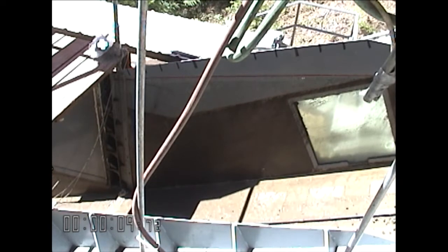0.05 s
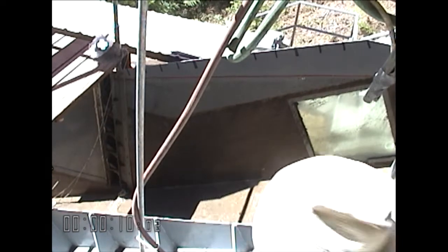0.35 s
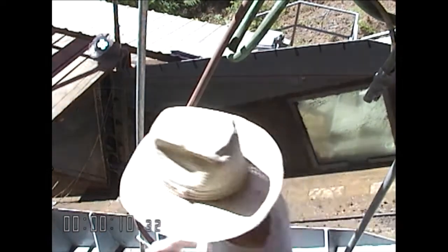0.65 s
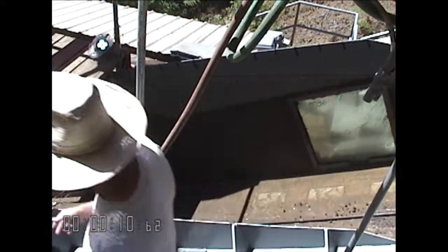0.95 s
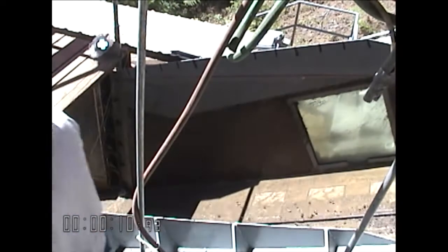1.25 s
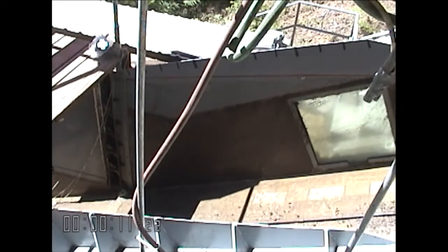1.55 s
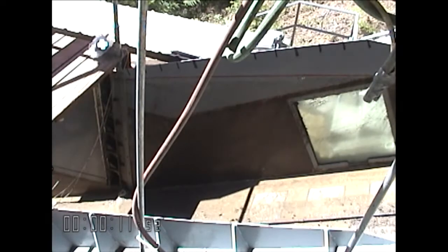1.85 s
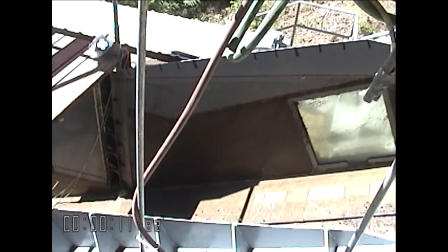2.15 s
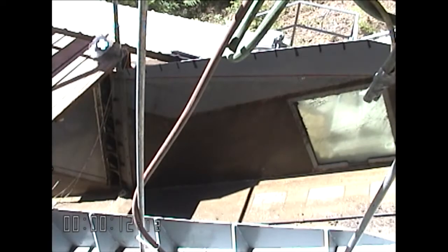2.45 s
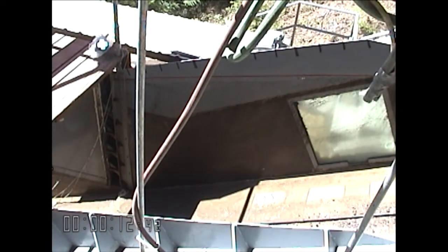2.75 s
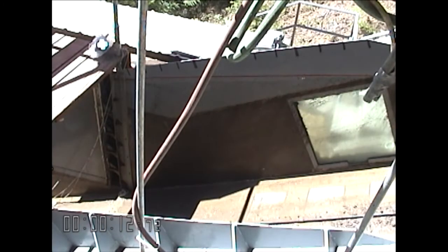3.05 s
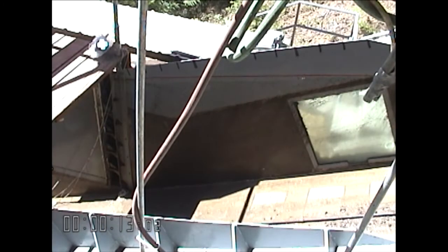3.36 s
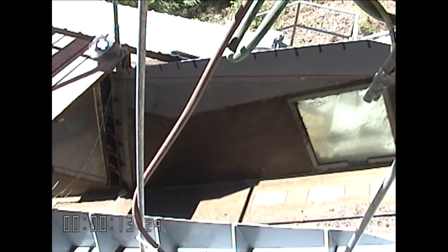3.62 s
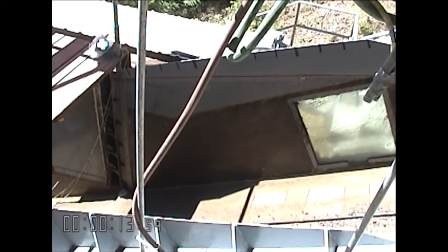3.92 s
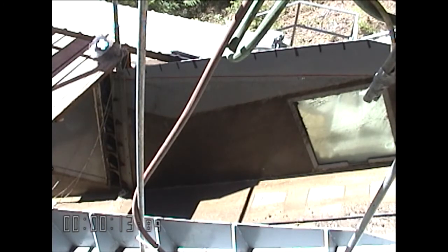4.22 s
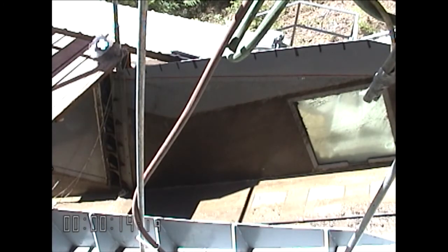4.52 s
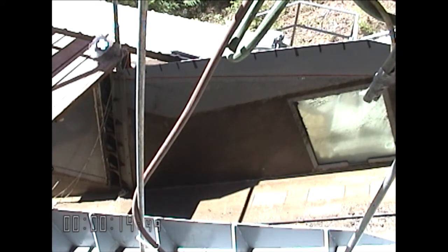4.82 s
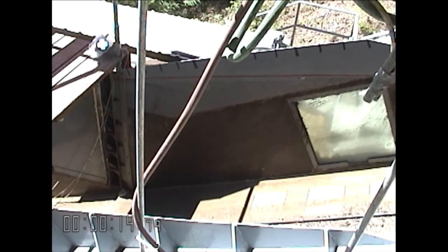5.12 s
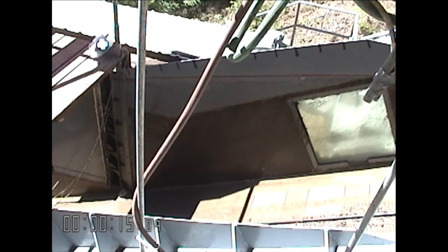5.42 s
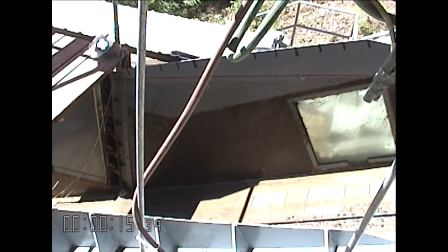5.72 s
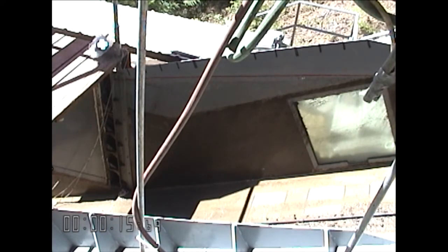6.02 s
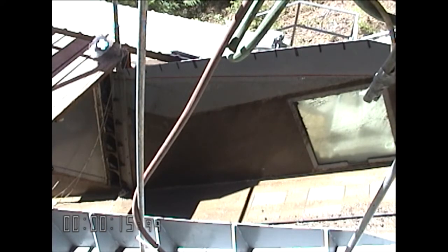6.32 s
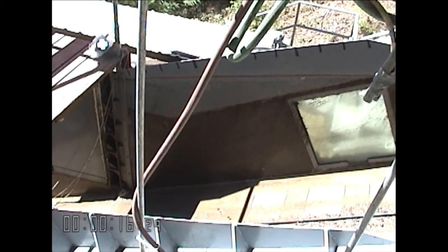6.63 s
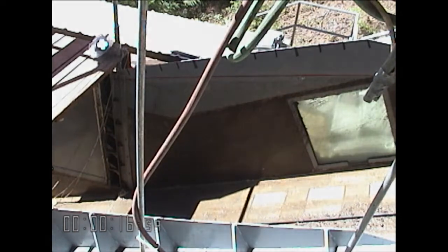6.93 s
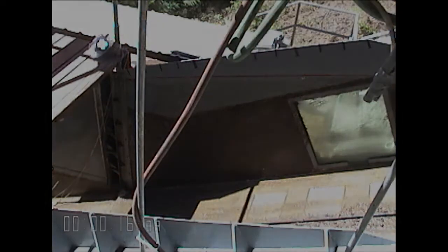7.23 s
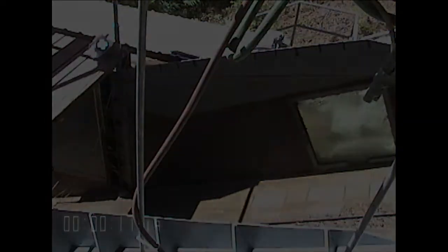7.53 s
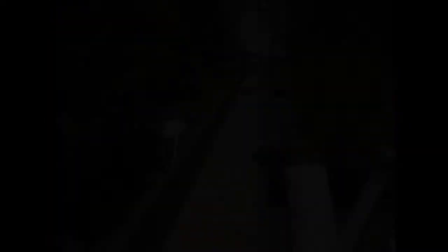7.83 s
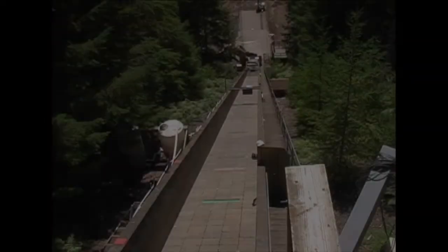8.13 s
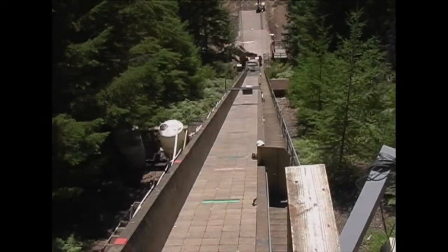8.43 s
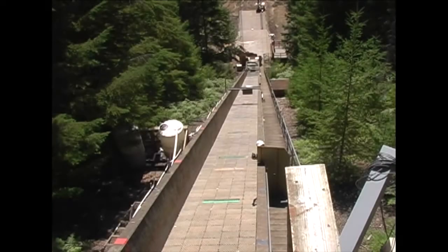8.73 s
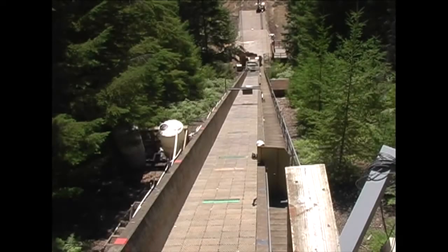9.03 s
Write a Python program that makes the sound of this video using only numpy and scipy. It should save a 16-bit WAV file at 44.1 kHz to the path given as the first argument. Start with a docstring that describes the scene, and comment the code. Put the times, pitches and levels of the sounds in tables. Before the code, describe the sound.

Heard from a platform over an outdoor concrete channel, a surge of water roars and splashes while three soft steps thud nearby. The flow gradually weakens to a fizzing wash, with small plops, sharp clicks of grit and stones knocking together over a faint low pump hum. Near the end everything fades away and a steady, throbbing engine takes over.

```python
"""An outdoor concrete flume: water and debris rush down, surge for about two seconds, then ebb.
The water roars, splashes and sprays, trapped air plops, and stones clack and click as they collide.
A pump hums and three soft steps set the platform rumbling. The sound fades out, then fades in
on a quieter spot above the flume, where an engine drones and throbs with each firing."""
import sys
import numpy as np
from scipy import signal
from scipy.fft import rfft, irfft, next_fast_len
from scipy.io import wavfile
from scipy.ndimage import uniform_filter1d, map_coordinates

SR = 44100
rng = np.random.default_rng(int(sys.argv[2]) if len(sys.argv) > 2 else 0)


def int16_out(signal):
    """Quantize to a 16-bit WAV file."""
    q = np.round(np.clip(np.atleast_2d(signal).T, -1, 1) * 32767)
    wavfile.write(sys.argv[1], SR, q.astype(np.int16))


N = 408807

# Stereo balance of the water. Each row: frequency in Hz, left minus right in dB.
WATER_BALANCE = [(60, -1.5), (200, -5), (350, -4), (640, -1.5), (1150, -0.7), (2000, 0)]
# Splashing wash, slower to subside than the flow. Each row: time in seconds, level in dB.
WASH_ENVELOPE = [(0, -26), (1.2, -26), (2.4, -26.5), (3.2, -29.5), (4.8, -31), (5.4, -31), (6.9, -33.5)]
EBB_DB_PER_DB = 1.12  # spray and gravel level per dB of flow


def amp(db):
    """Decibels to gain."""
    return 10 ** (np.asarray(db) / 20)


def unit(x):
    """Scale to rms 1."""
    return x / np.sqrt(np.mean(x ** 2) + 1e-20)


def along(points, hz):
    """Interpolate (Hz, value) rows on a log axis."""
    knots_hz, values = np.transpose(points)
    return np.interp(np.log(hz + 1), np.log(knots_hz + 1), values)


def curve(points):
    """Interpolate (seconds, value) rows at every sample."""
    knots_s, values = np.transpose(points)
    return np.interp(np.arange(N) / SR, knots_s, values)


def wobble(rate_hz):
    """Smooth random curve, rate_hz knots a second."""
    at = np.linspace(0, N, N // 32)
    knots = rng.standard_normal(int(N * rate_hz / SR) + 4)
    return np.interp(np.arange(N), at, map_coordinates(knots, [at * rate_hz / SR]))


def filtered(x, response):
    """Apply a complex frequency response."""
    n = x.shape[-1]
    padded = next_fast_len(n + SR // 4)
    return irfft(rfft(x, padded) * response(np.fft.rfftfreq(padded, 1 / SR)), padded)[..., :n]


def resonance(f, hz, width_hz):
    """Response of one damped mode."""
    return 1j * f * width_hz / (hz * hz - f * f + 1j * f * width_hz)


def add(track, start_s, sound):
    """Mix a sound into a track."""
    part = track[..., round(start_s * SR):][..., :sound.shape[-1]]
    part += sound[..., :part.shape[-1]]


def flow_db():
    """Flow strength relative to the height of the surge."""
    # Each row: time in seconds, relative strength in dB.
    strength = [(0.0, -27), (1.67, -26.5), (3.09, -33.5), (4.65, -34.5), (5.21, -36.5), (6.82, -38),
                (6.9, -38.5)]
    strength_db = curve(strength)
    return strength_db - strength_db.max()


def impacts(rate_hz, spread_db):
    """Two trains of tiny random impacts; spread_db makes a few stand out."""
    size = amp(spread_db * np.minimum(rng.exponential(size=(2, N)), 2)) * rng.choice([-1, 1], (2, N))
    return unit(size * (rng.random((2, N)) < rate_hz / SR))


def struck(peak_db, contact_t60_s, rattle_t60_s, rattle, response):
    """A brief gritty contact and its dying rattle, rung through a response."""
    t = np.arange(SR // 4) / SR
    envelope = amp(-60 * t / contact_t60_s) + rattle * amp(-60 * t / rattle_t60_s)
    sound = filtered(rng.choice([-1, 1], len(t)) * envelope, response)
    return amp(peak_db) * sound / np.abs(sound).max()


def strays(max_db, spread_db, db_per_flow_db, ring_hz, octaves, count):
    """Scattered lesser hits, weaker as the flow ebbs. Each row: start in seconds, peak in dB, Hz."""
    when, size, pitch = rng.random((count, 3)).T
    at = ((np.arange(count) + when) / count * N).astype(int)
    peak_db = max_db - spread_db * size + db_per_flow_db * flow_db()[at]
    return list(zip(at / SR, peak_db, ring_hz * 2 ** (octaves * (pitch - .5))))


def hum(tones, drift, flutter_db, rough_rad):
    """Machine tones drift together in pitch; each wavers in level and phase on its own."""
    clock_s = np.cumsum(1 + drift * wobble(3)) / SR
    tone = lambda hz: np.sin(2 * np.pi * (hz * clock_s + rng.random()) + rough_rad * wobble(24))
    return np.sqrt(2) * sum(amp(db + flutter_db * wobble(4.4)) * tone(hz) for hz, db in tones)


def pump():
    """A low wavering hum, to the right."""
    # Each row: frequency in Hz, rms level before panning in dB.
    tones = [(35.9, -59.5), (54, -66.5), (72, -59), (119.8, -53.6), (161.8, -59.5)]
    return hum(tones, drift=.00089, flutter_db=1.5, rough_rad=.38) * amp([[-3], [2.3]])


def steps():
    """Each footfall sets the platform rumbling briefly."""
    # Each row: start in seconds, relative level in dB, thud in Hz, t60 in seconds.
    thuds = [(.257, -23.5, 134, 0.59), (.85, -29, 122, 0.32), (.93, -40, 48, .5), (1.44, -30.5, 80, .35)]
    out, t = np.zeros(N), np.arange(SR // 2) / SR
    for start_s, db, hz, t60_s in thuds:
        rumble = unit(filtered(rng.standard_normal(len(t)), lambda f: resonance(f, hz, .95 * hz) ** 2))
        envelope = amp(-60 * t / t60_s) * (1 - np.exp(-t / .0089))
        add(out, start_s, .49 * amp(db) * rumble * envelope)
    return out


def engine(noise_db, firing_hz, throb, stereo_width):
    """A drone over mechanical noise whose midrange swells, a little unevenly, with every firing."""
    # Each row: frequency in Hz, rms level before panning in dB.
    tones = [(54, -76), (72, -68), (119.6, -53.5), (219.5, -45), (240.4, -48), (263.3, -44.7), (340, -53),
             (370.8, -49.5), (394.3, -47.3), (527, -56.3), (566, -53.8), (699.7, -58.5), (742.6, -59.5),
             (1060, -60), (1148.5, -60.5), (1237, -63), (1325, -58.5), (1410, -63)]
    # Each row: frequency in Hz, relative noise density in dB.
    spectrum = [(25, -30), (60, -18), (110, -9), (200, -5), (340, -3.5), (480, -4.5), (560, -8),
                (610, -11.5), (700, -6), (850, -10.5), (1300, -9), (1700, -14.5), (2550, -13.5),
                (3200, -21.5), (5200, -29), (11000, -35), (12000, -44)]
    mid, side = filtered(rng.standard_normal((2, N)), lambda hz: amp(along(spectrum, hz)))
    noise = unit(np.array([mid + stereo_width * side, mid - stereo_width * side]))
    clatter = filtered(noise, lambda f: np.abs(resonance(f, hz=1300, width_hz=1700)))
    depth = throb * amp(3 * np.tanh(wobble(12)))
    firing = depth * np.cos(2 * np.pi * firing_hz * np.arange(N) / SR + .5 * wobble(8))
    drone = hum(tones, drift=.001964, flutter_db=1.5, rough_rad=.24) * amp([[-.2], [.2]])
    return amp(noise_db) * (noise + firing * clatter) + drone


def wall_echo(x, stereo_width):
    """Echo between the flume's walls; the treble dies first."""
    # Each row: frequency in Hz, t60 in seconds.
    decay = [(200, .3), (3000, 0.18), (11000, 0.18)]
    hz, t, noise = signal.stft(rng.standard_normal((2, SR // 3)), SR, nperseg=256)
    mid, side = signal.istft(noise * amp(-60 * t / along(decay, hz)[:, None]), SR, nperseg=256)[1]
    tail = np.array([mid + stereo_width * side, mid - stereo_width * side]) / np.linalg.norm(mid)
    return signal.fftconvolve(x, tail, axes=1)[:, :N]


def bubbles(re_wash_db, centre_hz, decay_cycles, rise_per_s, count):
    """Trapped air rings as short rising plops; their level follows the wash."""
    out, t = np.zeros(N), np.arange(SR // 10) / SR
    for when, pitch, size in rng.random((count, 3)):
        hz = centre_hz * 2 ** (3 * pitch - 1.5)
        ring = np.sin(2 * np.pi * hz * t * (1 + rise_per_s * t))
        envelope = np.exp(-t * hz / decay_cycles) * (1 - np.exp(-t / .0022))
        add(out, when * N / SR, size ** 2 * ring * envelope)
    return amp(re_wash_db + curve(WASH_ENVELOPE)) * unit(out)


def gravel(surge_db, ring_hz, width_hz):
    """Pebbles chatter in clusters along the bed, as hard as the current pushes them."""
    contacts = impacts(rate_hz=130, spread_db=0)[0] * amp(3.1 * np.tanh(wobble(14)))
    chatter = unit(filtered(contacts, lambda f: resonance(f, ring_hz, width_hz) ** 2))
    return amp(surge_db + EBB_DB_PER_DB * flow_db()) * chatter


def debris_knocks(contact_t60_s, rattle_t60_s, rattle):
    """Bigger pieces hit the channel with lower, hollower knocks."""
    # Each row: start in seconds, peak in dB, ring in Hz, bandwidth in Hz.
    hits = [(.422, -17.5, 1510, 75), (.424, -17.5, 2580, 260), (6.233, -30, 610, 70),
            (6.255, -29.5, 840, 110), (6.272, -25.5, 960, 150)]
    out = np.zeros(N)
    for start_s, db, hz, width_hz in hits:
        ring = lambda f: resonance(f, hz, width_hz) ** 2
        add(out, start_s, struck(db, contact_t60_s, rattle_t60_s, rattle, ring))
    return out


def grit_clicks(width_hz, contact_t60_s, skitter_t60_s):
    """Flung grit hits once, sharply, and skitters on, a little to one side."""
    # Each row: start in seconds, peak before panning in dB, ring in Hz, skitter gain.
    hits = [(.6793, -16, 7000, .2), (.924, -16, 9500, .25), (1.2872, -3.5, 7300, .14), (1.29, -6, 9400, .2),
            (1.5981, -8, 9600, .12), (1.6214, -12, 8000, .12), (2.2143, -17, 7000, .25),
            (2.6345, -15, 6300, .15), (2.8663, -11, 5900, .14), (3.1267, -19, 5600, .25),
            (3.5996, -20, 5600, .25), (4.1647, -8, 5500, .13), (4.1678, -10, 4400, .12),
            (4.2562, -21, 8500, .3), (4.3964, -14.5, 9200, .07), (4.5108, -14.5, 8700, .12),
            (4.648, -19, 7400, .4), (4.755, -16, 10500, .15), (4.7599, -12.5, 10500, .1),
            (4.9433, -13.5, 9200, .12), (4.951, -8, 9500, .08), (5.3702, -23, 6500, .5),
            (5.4735, -21, 6000, .2), (5.6545, -24, 9600, .4), (5.7592, -23, 6500, .2),
            (5.8967, -11, 7500, .03), (5.9476, -21, 8000, .2), (5.9767, -20, 7000, .15),
            (6.3742, -26, 9000, .3), (6.4206, -23, 6800, .3), (6.876, -22.5, 9200, .25),
            (7.3763, -17, 5000, .2)]
    lesser = strays(max_db=-18.5, spread_db=4, db_per_flow_db=.7, ring_hz=7200, octaves=1, count=36)
    lesser = [(*hit, rng.uniform(.15, .4)) for hit in lesser]
    out = np.zeros((2, N))
    for start_s, db, hz, skitter in hits + lesser:
        ring = lambda f: resonance(f, hz, width_hz) / np.sqrt(1 + (f / 11300) ** 40)
        pan = amp(rng.normal(0, .49) * np.array([[1], [-1]]))
        add(out, start_s, pan * struck(db, contact_t60_s, skitter_t60_s, skitter, ring))
    return out


def stone_clacks(contact_t60_s, scrape, scrape_t60_gaps, bounces, bounce_db, clink_db, clink_width_hz):
    """Stones meet with a narrow clink, scrape and bounce, each time weaker and slightly retuned."""
    # Each row: start in seconds, peak in dB, ring in Hz, bandwidth in Hz, bounce gap in seconds.
    hits = [(1.962, -16, 3400, 1500, 0.0016), (2.0307, -14, 3900, 3000, 0.0033),
            (2.6924, -23, 4020, 1200, .005), (3.023, -22, 4100, 1300, 0.008),
            (3.071, -25.5, 4100, 1000, .006), (3.2536, -25, 4000, 1500, .006),
            (3.3065, -24, 3950, 900, .008), (3.4234, -21, 3980, 900, 0.0065),
            (3.8927, -16.7, 3750, 1200, .014), (3.9275, -20, 3700, 1200, .005),
            (3.9386, -17.5, 3900, 1300, .016), (4.0459, -17.5, 3950, 1600, .004),
            (4.1648, -14.5, 2900, 1000, .005), (4.3258, -13, 3850, 1100, .007),
            (4.549, -23, 3800, 1200, .005), (4.648, -20, 4300, 2000, 0.01), (4.8106, -24, 3750, 1200, .005),
            (5.2705, -23.5, 3900, 1600, 0.013), (5.6387, -25, 4200, 2000, 0.011),
            (5.7426, -21.5, 3900, 1600, .011), (6.026, -22, 3850, 1700, 0.015),
            (6.106, -22.7, 3940, 1000, 0.0078), (7.098, -26, 3950, 1200, .011),
            (7.2, -27.5, 3850, 1100, .008), (7.334, -21, 3750, 1400, 0.012),
            (7.6184, -21, 3950, 1400, 0.0069)]
    lesser = strays(max_db=-24, spread_db=4, db_per_flow_db=.43, ring_hz=3900, octaves=.2, count=12)
    lesser = [(*hit, rng.uniform(900, 1800), rng.uniform(.0041, .012)) for hit in lesser]
    out = np.zeros(N)
    for start_s, db, hz, width_hz, gap_s in hits + lesser:
        for k in range(bounces):
            pitch_hz = hz * 2 ** (.025 * rng.normal())
            body = lambda f: resonance(f, pitch_hz, width_hz)
            ring = lambda f: body(f) * (body(f) + amp(clink_db) * resonance(f, pitch_hz, clink_width_hz))
            clack = struck(db + k * bounce_db, contact_t60_s, scrape_t60_gaps * gap_s, scrape, ring)
            add(out, start_s + k * gap_s, clack)
    return out


def gushes():
    """Waves of water pass, each swelling and sinking in its own band."""
    # Each row: crest in seconds, level in dB, centre in Hz, bandwidth in Hz, half length in seconds.
    waves = [(.3, -31, 754, 1100, 0.16), (1.8, -31.5, 2300, 1600, 0.68), (2.003, -31.5, 4400, 2600, 0.07),
             (3.5, -41, 376.9, 90, 0.67)]
    out, t = np.zeros((2, N)), np.arange(N) / SR
    for crest_s, db, hz, width_hz, half_s in waves:
        rush = unit(filtered(rng.standard_normal(N), lambda f: resonance(f, hz, width_hz) ** 2))
        pan_db = along(WATER_BALANCE, hz) * np.array([[.5], [-.5]])
        out += amp(db + pan_db) * rush * np.exp(-((t - crest_s) / half_s) ** 2)
    return out


def churn(patchy_db):
    """Two noises whose level varies in patches of time and pitch."""
    noise = signal.stft(rng.standard_normal((2, N)), nperseg=512)[2]
    patches = uniform_filter1d(rng.standard_normal(noise.shape[1:]), size=4, axis=0)
    patches = unit(uniform_filter1d(patches, size=9, axis=1))
    return unit(signal.istft(noise * amp(patchy_db * patches), nperseg=512)[1][:, :N])


def in_flume(pair, spectrum):
    """Colour two unrelated signals and place them in the hollow channel: stereo, rms 1."""
    # Each row: resonance in Hz, bandwidth in Hz, lift in dB.
    modes = [(284, 32, 1), (385, 41, 5), (521, 23, 3), (936, 33, 3.5), (1370, 54, 2), (1557, 89, 2)]
    # Each row: frequency in Hz, left-right coherence.
    coherence = [(60, 0.9), (250, 0.99), (600, 0.9), (1200, 0.97), (2000, 1), (4200, 1), (5300, 0.99),
                 (7500, 0.64), (11000, 0.88)]
    # Each row: frequency in Hz, phase lead of the left in radians.
    lead = [(60, -.1), (250, -0.16), (600, -0.3), (1300, -0.11), (2000, 0)]
    hollow_db = lambda f: sum(db * np.abs(resonance(f, hz, width_hz)) ** 2 for hz, width_hz, db in modes)
    colour = lambda f: amp(along(spectrum, f) + hollow_db(f))
    spread_rad = lambda f: np.arccos(np.clip(along(coherence, f), -1, 1)) / 2
    mid, side = filtered(pair, lambda f: colour(f) * [np.cos(spread_rad(f)), np.sin(spread_rad(f))])
    half = np.array([[.5], [-.5]])
    pan = lambda f: amp(half * along(WATER_BALANCE, f)) * np.exp(1j * half * along(lead, f))
    return unit(filtered(np.array([mid + side, mid - side]), pan))


def roar(start_db, fall_db, drain_s):
    """The deep roar dies away ever faster as the flume drains."""
    # Each row: frequency in Hz, relative density in dB.
    spectrum = [(35, -35.5), (55, -28), (95, -14), (135, -8), (185, -8), (250, -1.5), (400, -3), (560, -1),
                (720, -5), (910, -12.5), (1500, -68)]
    level_db = start_db - fall_db * (np.arange(N) / SR / drain_s) ** 1.13
    return amp(level_db + .38 * wobble(8.2)) * in_flume(churn(patchy_db=.5), spectrum)


def wash():
    """Churning water and small splashes fill the midrange."""
    # Each row: frequency in Hz, relative density in dB.
    spectrum = [(350, -21.5), (600, -3.5), (800, -1.2), (1200, -0.8), (1600, -2), (2100, -3), (2800, -6),
                (3200, -8.5), (4200, -28), (7000, -84.5)]
    splashes = unit(churn(patchy_db=.98) + .48 * impacts(rate_hz=900, spread_db=2.5))
    return amp(curve(WASH_ENVELOPE) + .17 * wobble(14)) * in_flume(splashes, spectrum)


def spray(surge_db, breakup_db):
    """Dense spray breaks up into clumps of drops, fully once the flow has fallen by breakup_db."""
    # Each row of both: frequency in Hz, relative density in dB.
    mist_spectrum = [(1710, -11), (2900, -1.5), (5810, -1), (8250, -7), (9290, -7.5), (10800, -12),
                     (11600, -15.5), (12000, -24), (15600, -52), (22000, -120)]
    trickle_spectrum = [(1710, -38.5), (2900, -4.5), (3360, -1), (3880, -0.5), (5510, -7), (8450, -11),
                        (9860, -10.5), (11200, -14.5), (12000, -22.5), (15600, -63.5), (22000, -120)]
    mist = unit(churn(patchy_db=1.5) + .5 * impacts(rate_hz=1300, spread_db=7))
    mist = in_flume(mist, mist_spectrum)
    drops = impacts(rate_hz=350, spread_db=1) * amp(6.6 * np.tanh(wobble(22)))
    trickle = in_flume(unit(churn(patchy_db=2) + .45 * drops), trickle_spectrum)
    dense = np.clip(1 + flow_db() / breakup_db, 0, 1)
    fizz = np.sqrt(dense) * mist + np.sqrt(1 - dense) * trickle
    return amp(surge_db + EBB_DB_PER_DB * flow_db()) * fizz


def scene():
    """The flume fades out, then the engine fades in."""
    # Each row of both: time in seconds, gain.
    fade_out = [(6.88, 0.99), (7.4, 0.44), (7.85, 0.002)]
    fade_in = [(7.85, 0), (8.1, 0.3), (8.5, 0.88)]
    stones = grit_clicks(width_hz=3600, contact_t60_s=.0014, skitter_t60_s=.06)
    stones += stone_clacks(contact_t60_s=.003, scrape=.26, scrape_t60_gaps=9,
                           bounces=3, bounce_db=-2.5, clink_db=-3, clink_width_hz=280)
    stones += debris_knocks(contact_t60_s=.00075, rattle_t60_s=.033, rattle=.016)
    bed = gravel(surge_db=-38, ring_hz=3850, width_hz=860)
    bed += bubbles(re_wash_db=-19, centre_hz=1010, decay_cycles=9.6, rise_per_s=1.5, count=600)
    pump_hum = pump()
    water = roar(start_db=-29, fall_db=13.5, drain_s=6.94) + wash()
    water += spray(surge_db=-26, breakup_db=7.5) + gushes()
    echo = amp(-8) * wall_echo(stones, stereo_width=.19)
    flume = water + bed + stones + echo + pump_hum + steps()
    drone = engine(noise_db=-39.5, firing_hz=17.85, throb=.33, stereo_width=.13)
    return curve(fade_out) * flume + curve(fade_in) * drone


def record(dry):
    """Steep low-pass at 11.9 kHz."""
    return filtered(dry, lambda hz: 1 / np.sqrt(1 + (hz / 11900) ** 220))


dry = scene()
out = record(dry)
int16_out(out)
```